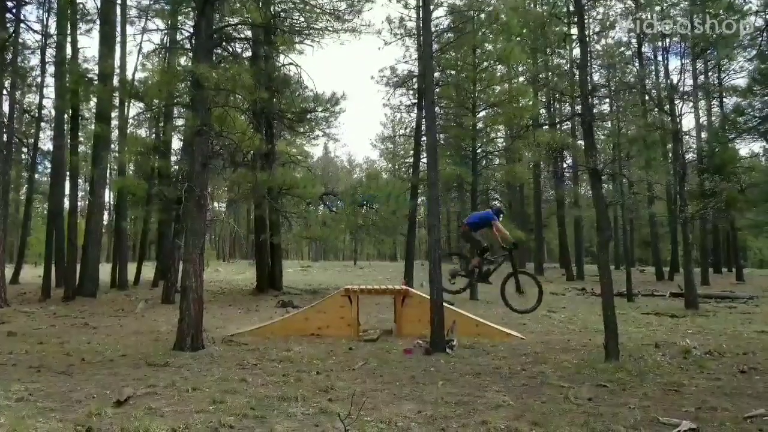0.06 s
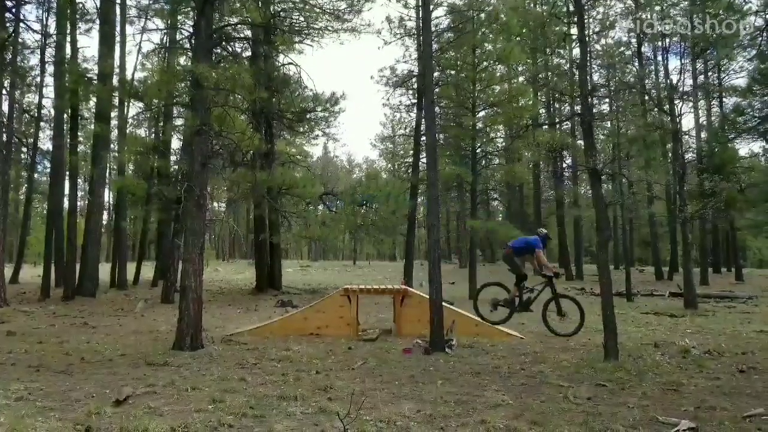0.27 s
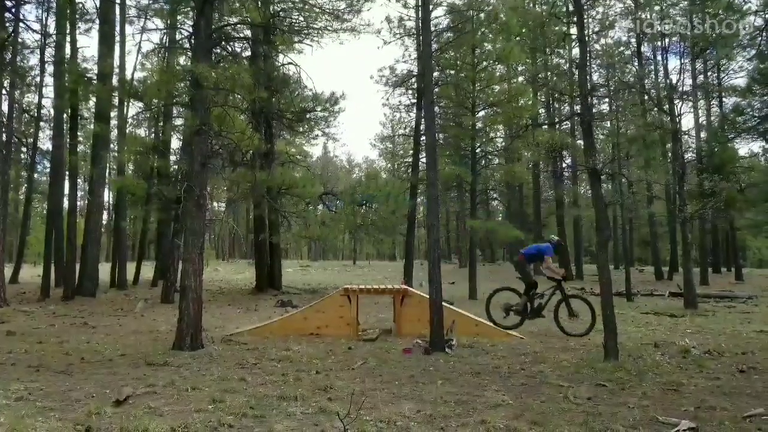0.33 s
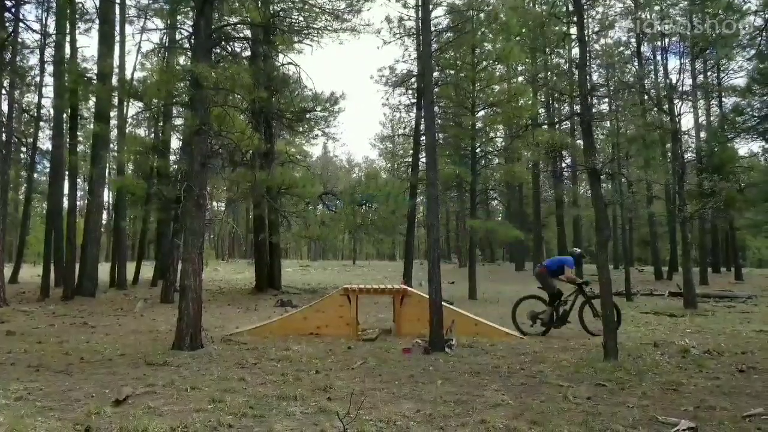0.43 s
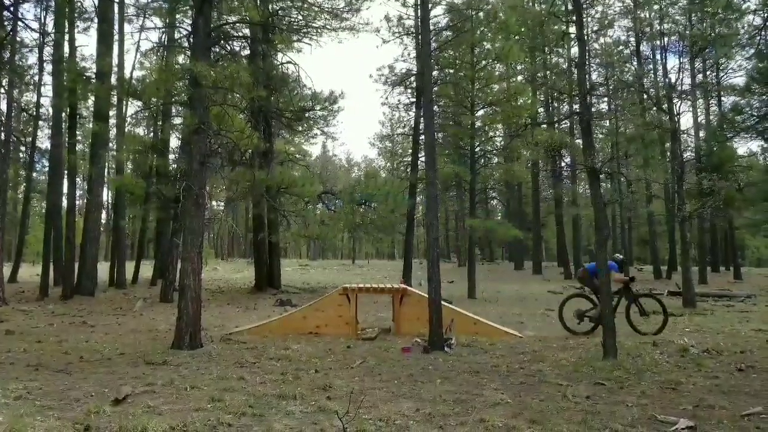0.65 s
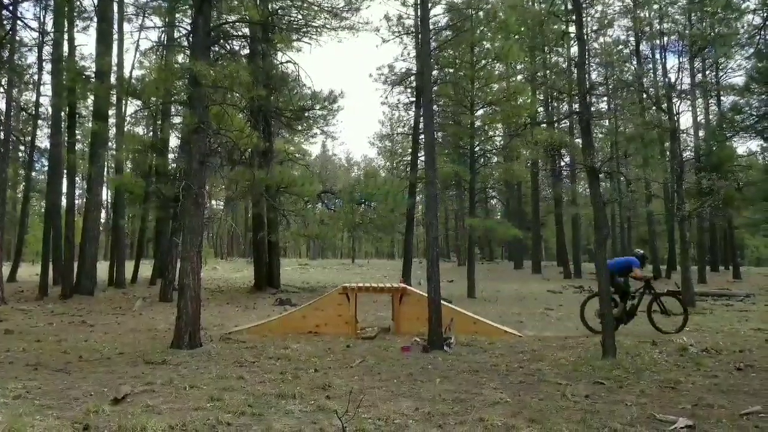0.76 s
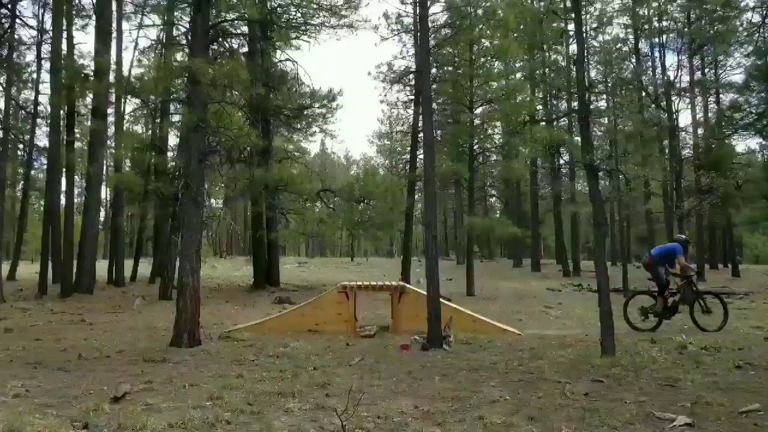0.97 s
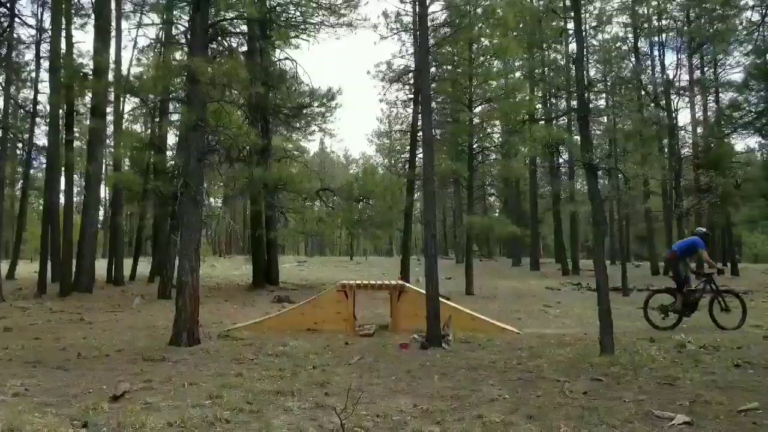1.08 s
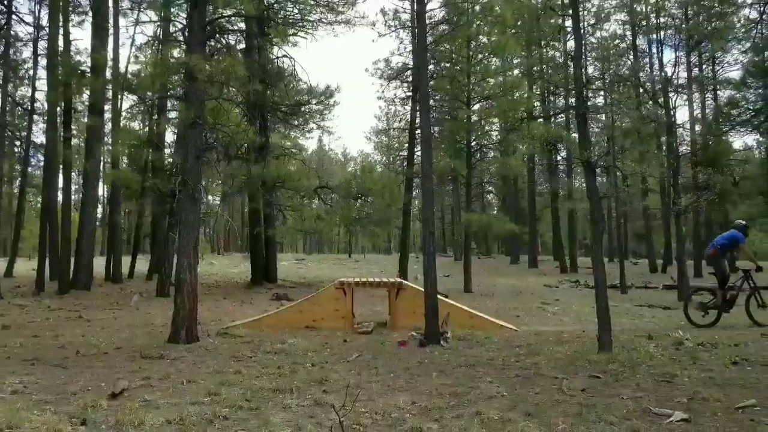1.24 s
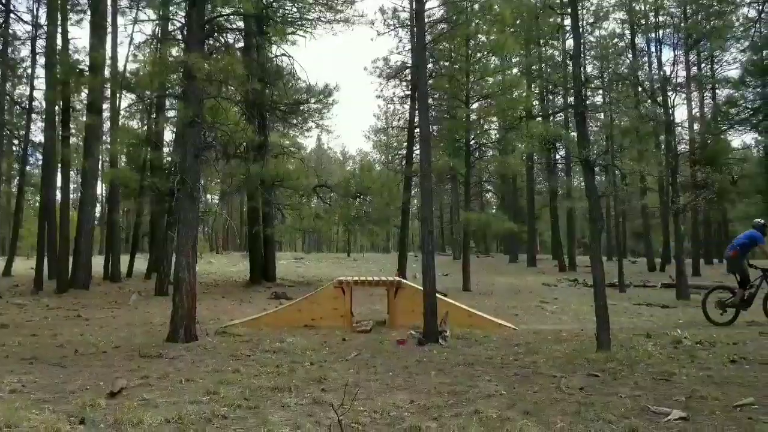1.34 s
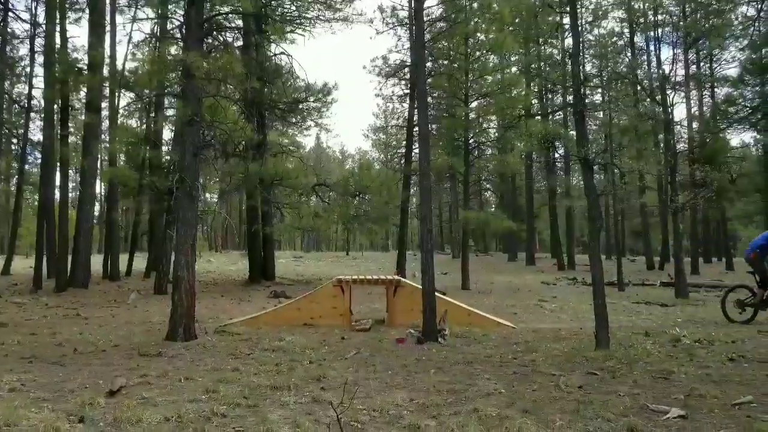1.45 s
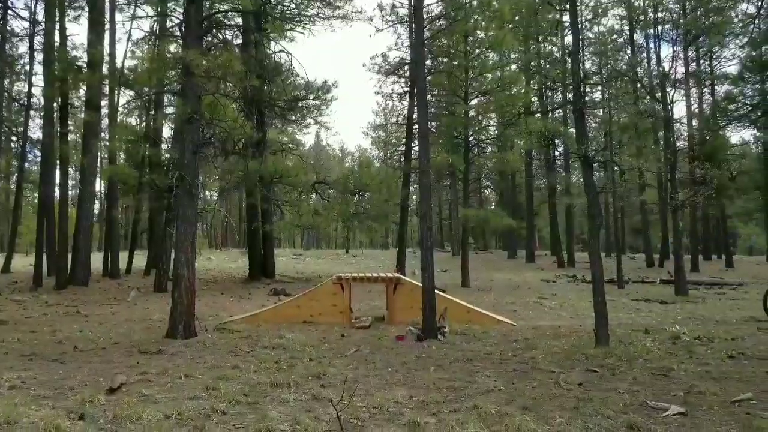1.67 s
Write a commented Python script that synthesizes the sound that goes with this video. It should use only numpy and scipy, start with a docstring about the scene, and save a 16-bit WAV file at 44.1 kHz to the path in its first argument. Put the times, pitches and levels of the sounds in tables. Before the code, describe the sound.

A mountain bike lands with a hollow wooden thud on a ramp, then its freewheel clicks away

```python
"""Mountain bike on a plywood ramp

Place: an open pine forest. A bike lands on a hollow ramp, rolls down it and coasts off to the right of two microphones.
Each blow rings the ramp's modes and cracks in noise; the trunks return it as a fading rumble of dense echoes.
Freewheel pawls ring the hub, falling silent through the heaviest blows; tyres, clatter and fizz are shaped noise.
Behind it all lies a steady, quiet forest air of coloured noise."""
import sys
import numpy as np
from scipy import signal
from scipy.fft import rfft, irfft, next_fast_len
from scipy.io import wavfile
from scipy.ndimage import uniform_filter1d, map_coordinates

SR = 44100
rng = np.random.default_rng(int(sys.argv[2]) if len(sys.argv) > 2 else 0)


def transcribe(u):
    """Save the signal u as a 16-bit wav file named by the first command-line argument.

    u: samples, shape (n,) or (channels, n), limited to [-1, 1]; the rate is SR.
    q: integer samples, one column per channel.
    """
    v = np.clip(np.atleast_2d(u).T, -1, 1)
    q = np.round(v * 32767).astype(np.int16)
    wavfile.write(sys.argv[1], SR, q)


N = 74970  # length [samples]


def gain_of(db):
    """Amplitude factor of a level in dB."""
    return 10 ** (np.asarray(db) / 20)


def evened(x):
    """Scales a signal to an RMS of one."""
    return x / np.sqrt(np.mean(x ** 2) + 1e-20)


def read(points, hz):
    """Reads a table of (frequency, value) along a logarithmic frequency axis."""
    f, value = np.transpose(points)
    return np.interp(np.log(hz + 1), np.log(f + 1), value)


def add(mix, s, sound):
    """Adds a sound to the mix at s seconds, cut off at the end."""
    part = mix[max(round(s * SR), 0):][:len(sound)]
    part += sound[:len(part)]


def colour(x, points, share=1):
    """Filters by a dB spectrum, or by a share of its dB."""
    size = next_fast_len(N + 4096)
    gain = gain_of(share * read(points, np.fft.rfftfreq(size, 1 / SR)))
    return irfft(rfft(x, size) * gain, size)[..., :N]


def noise(points, share=1):
    """Steady coloured noise with an RMS of one."""
    return evened(colour(rng.standard_normal(N), points, share))


def grain(depth_db, smooth_samples):
    """Random gain that wanders in dB, which makes steady noise gritty."""
    return gain_of(depth_db * evened(uniform_filter1d(rng.standard_normal(N), smooth_samples)))


# Blows and bumps of the tyres on the ramp:
# (time [s], boom level [dB], contact length [ms], crack level [dB], pitch of the panel struck most [Hz])
TYRE_BLOWS = [(.1722, -35, 6.3, -55.5, 101), (.2023, -26.5, 1.6, -44.5, 150), (0.2083, -12, 0.73, -19, 161),
              (.226, -8, 1.1, -29, 292), (0.2521, -15, 2.05, -40, 204), (.2742, -29.5, 1.4, -35.5, 246),
              (.301, -33.5, 0.4, -45, 306), (.33, -18, 3.7, -51, 223), (0.3809, -12, 2.16, -34, 138),
              (.3885, -20, 2.77, -42.5, 190), (.3945, -28, 1.07, -48.5, 744), (.4215, -22.5, 4.3, -60, 109),
              (0.47, -22, 2.27, -48, 140), (0.503, -28, 2.9, -56, 250), (.531, -31, 5, -51, 138),
              (0.625, -39.5, 4.5, -55, 247), (.673, -47, 3.2, -53, 92), (0.733, -39, 3, -58.5, 62),
              (.789, -40, 2.67, -55.5, 141), (0.875, -51.5, 3.7, -69.5, 195), (0.942, -53.5, 1.9, -62, 235)]
# Modes the hollow ramp rings with: (frequency [Hz], relative level [dB], T60 [s])
RAMP_MODES = [(46, -45, 0.073), (67.7, -7.5, 0.28), (97.9, 0.5, 0.11), (140.1, -8, 0.24), (204.4, -7, 0.23),
              (354.7, -17, 0.23), (531, -7.5, 0.11), (616.6, -7, 0.093), (700.4, -8, 0.23),
              (757.8, -3.5, 0.13), (874.4, 2, 0.04), (1180, -14, .09), (1290, -19, 0.043),
              (1480, -8.5, 0.081)]
# Pitch of the deck panel as the rider's weight rolls over it: (time [s], frequency [Hz])
DECK_PITCH = [(.2, 259.7), (.248, 272.5), (.266, 222.5), (.29, 249.4), (.312, 303), (.335, 239),
              (.362, 268), (.39, 270.8), (.455, 300), (.495, 242), (.53, 282), (.65, 247), (.72, 230),
              (.78, 286)]
# Spectrum of the cracking boards: (frequency [Hz], relative density [dB per Hz])
CRACK_SPECTRUM = [(300, 2.5), (550, -1.5), (850, -1.5), (1000, -10), (1180, -5.5), (1900, -10.5),
                  (2400, -10.5), (2900, -9), (3400, -12.5), (4500, -9.5), (5300, -17.5), (6050, -14),
                  (7200, -34.5), (8500, -69), (11500, -39.5), (15500, -57.5)]
DECK_DB, DECK_T60 = 1., 0.16  # relative level [dB], decay [s]
PLACE_DB_PER_OCTAVE, SWELL_S = 5, 0.00098  # loss away from the struck panel; time constant of the swell
IN_STEP_BELOW_HZ = 120  # modes below this start with the same sign
SNAP_DB, SNAP_T60 = 4, 0.0058  # the very first edge of each crack [dB re crack, s]
CRACK_T60 = 0.09  # [s]
SHUDDER_DB, SHUDDER_T60 = -8.5, 0.24  # then the boards shudder [dB re crack, s]


def ramp():
    """Each blow is a rounded push that swells the panel modes near it, plus a crack and a shudder of noise."""
    boom, crack, t = np.zeros(N), np.zeros(N), np.arange(SR // 2) / SR
    modes = RAMP_MODES + [(DECK_PITCH[0][1], DECK_DB, DECK_T60)]
    hz, db, t60 = np.transpose(modes)[:, :, None]
    alternating = (-1.) ** np.arange(len(hz))[:, None]
    sign = np.where(hz < IN_STEP_BELOW_HZ, 1, alternating)
    for s, boom_db, contact_ms, crack_db, struck_hz in TYRE_BLOWS:
        push = np.hanning(max(round(contact_ms * SR / 1000), 4))
        turns = hz * t
        # the last mode is the deck, whose pitch moves
        turns[-1] = np.cumsum(np.interp(s + t, *np.transpose(DECK_PITCH))) / SR
        near_db = np.maximum(-PLACE_DB_PER_OCTAVE * abs(np.log2(hz / struck_hz)), -14)
        strength = sign * gain_of(db + near_db - 60 * t / t60)
        ring = (strength * np.sin(2 * np.pi * turns)).sum(0)
        swelled = ring * (1 - np.exp(-t / SWELL_S))
        add(boom, s, gain_of(boom_db) * np.convolve(swelled, push / push.sum()))
        add(crack, s, gain_of(crack_db + SNAP_DB - 60 * t / SNAP_T60))
        add(crack, s, gain_of(crack_db - 60 * t / CRACK_T60))
        add(crack, s, gain_of(crack_db + SHUDDER_DB - 60 * t / SHUDDER_T60))
    rattle = evened(grain(2.5, 60))
    # about half the colour goes on before the bursts are shaped, half after
    bursts = crack * rattle * noise(CRACK_SPECTRUM, .5)
    crack_rms = np.sqrt(np.mean(crack ** 2))
    return boom + crack_rms * evened(colour(bursts, CRACK_SPECTRUM, 0.54))


# Freewheel pawls: (time [s], level [dB], hub resonance that rings most [Hz])
PAWL_TICKS = [(0.0202, -38.5, 2400), (0.0441, -48.5, 4070), (0.064, -49.5, 3530), (0.0784, -69.5, 3660),
              (0.1012, -46, 6180), (0.1223, -57, 3790), (0.1321, -46, 3900), (0.1516, -49, 6200),
              (0.1593, -43, 3170), (0.416, -41.5, 3720), (0.444, -41.5, 4230), (0.4519, -41.5, 6030),
              (0.4638, -44, 5600), (0.4697, -47, 6010), (0.4778, -44, 6140), (0.4838, -37.5, 6100),
              (0.493, -38.5, 6200), (0.5029, -60, 5100), (0.5284, -43, 3150), (0.5642, -47, 3520),
              (0.5899, -42, 5700), (0.6054, -45.5, 3700), (0.6223, -44.5, 3440), (0.6457, -45, 5460),
              (0.6693, -46, 6230), (0.6823, -47.5, 5600), (0.6939, -45, 5900), (0.7068, -43.5, 3670),
              (0.7285, -41, 4050), (0.7834, -44, 5970), (0.803, -52, 5685), (0.8173, -44, 5150),
              (0.836, -45, 5497), (0.8505, -42, 5390), (0.8682, -42.5, 5600), (0.8883, -57, 3670),
              (0.9019, -42, 3560), (0.92, -62, 5700), (0.93, -42, 5800), (0.9463, -42.5, 3970),
              (0.9549, -63, 3930), (0.9756, -45, 3590), (1.0, -43, 3750), (1.0116, -47.5, 3680),
              (1.0292, -47, 5770), (1.0448, -65, 3830), (1.0625, -45, 6070), (1.078, -47, 3730),
              (1.0898, -59, 3700), (1.1092, -46, 3900), (1.1399, -45.5, 3710), (1.1544, -45, 3580),
              (1.169, -73.5, 3940), (1.187, -43, 3920), (1.1993, -46.5, 4260), (1.2217, -52, 3730),
              (1.233, -45, 2880), (1.2417, -44.5, 2960), (1.2543, -50, 4130), (1.2883, -62, 3730),
              (1.3075, -50.5, 3640), (1.3402, -42.5, 2750), (1.3498, -62, 2880), (1.3669, -41.5, 2610),
              (1.3927, -48, 2760), (1.407, -50, 2800), (1.4228, -45.5, 4500), (1.454, -42, 2670),
              (1.505, -45.4, 2820), (1.533, -46, 5500), (1.5446, -44.7, 2820), (1.5684, -48, 4650),
              (1.5998, -48.5, 3500), (1.612, -48, 2950), (1.6207, -48.5, 3640), (1.6383, -52, 2840),
              (1.6485, -50.5, 3000), (1.663, -73, 5450), (1.673, -51, 2800), (1.6939, -48, 2860)]
# Hiss of each tick: (frequency [Hz], relative density [dB per Hz])
TICK_SPECTRUM = [(1200, -23.5), (2400, 2.5), (3500, 4), (4700, -17), (6000, 0.5), (7200, -12.5),
                 (8400, -26.5), (10500, -8), (12800, -1.5), (15500, -8.5)]
# Resonances of the hub: (frequency [Hz], relative level [dB], T60 [s])
HUB_MODES = [(2825, 2, 0.027), (3740, -3.5, 0.071), (4060, -4, 0.041), (5370, -4.5, 0.032),
             (6145, -5, 0.035)]
HUB_DB_PER_OCTAVE = 36.  # loss away from the resonance that rings most
HUB_SPREAD_DB, HUB_DETUNE = 1.5, .006  # random spread of level [dB] and pitch [fraction]
TICK_RISE_S, TICK_T60, PUFF_DB = 0.00073, 0.02, 0.5  # rise [s]; decay [s] and relative level [dB] of the hiss


def freewheel():
    """Each pawl gives a puff of hiss and rings the hub, most near its own resonance."""
    out, t = np.zeros(N), np.arange(3000) / SR
    hz, db, t60 = np.transpose(HUB_MODES)[:, :, None]
    hiss = noise(TICK_SPECTRUM)
    luck = rng.standard_normal((len(PAWL_TICKS), 3, len(HUB_MODES), 1))
    for (s, level_db, ring_hz), (strength, detune, phase) in zip(PAWL_TICKS, luck):
        near_db = np.maximum(-HUB_DB_PER_OCTAVE * abs(np.log2(hz / ring_hz)), -13)
        decay = gain_of(db + near_db + HUB_SPREAD_DB * strength - 60 * t / t60)
        ring = decay * np.sin(2 * np.pi * hz * (1 + HUB_DETUNE * detune) * t + 3 * phase)
        puff = np.resize(hiss[round(s * SR):], len(t)) * gain_of(PUFF_DB - 60 * t / TICK_T60)
        rise = np.minimum(t / TICK_RISE_S, 1)
        add(out, s, gain_of(level_db) * rise * (puff + ring.sum(0)))
    return out


# Tyres rolling: (time [s], level [dB])
ROLL_LEVEL = [(0.17, -42.5), (0.232, -51.5), (0.352, -45.5), (0.394, -61), (0.532, -54.5), (0.676, -63.5),
              (1.278, -57), (1.7, -56.5)]
# Spectrum of the tyres: (frequency [Hz], relative density [dB per Hz])
ROLL_SPECTRUM = [(24, -52.5), (40, -19), (106, -0.5), (512, -21), (780, -8), (1040, -14.5), (1690, -5),
                 (2360, -6), (2760, -8), (4800, -12), (6700, -13.5), (8000, -33), (10400, -47),
                 (17600, -120)]


def rolling():
    """Knobbly tyres hiss and crunch as grainy noise once they touch down."""
    t, (s, db) = np.arange(N) / SR, np.transpose(ROLL_LEVEL)
    touchdown = np.clip((t - TYRE_BLOWS[0][0]) / 0.0026, 0, 1)
    crunch = evened(grain(2., 200) * noise(ROLL_SPECTRUM))
    return touchdown * gain_of(np.interp(t, s, db)) * crunch


# Clatter of chain and cables after the jolts: (time [s], level [dB], length [s])
CHAIN_CLATTER = [(0.405, -66, 0.007), (0.437, -56, 0.11), (0.49, -49.5, 0.065), (0.713, -53.5, 0.052),
                 (0.904, -58, 0.019), (1.247, -68, 0.028), (1.44, -60, .025)]
# Spectrum of the clatter: (frequency [Hz], relative density [dB per Hz])
CLATTER_SPECTRUM = [(590, -53), (1000, -6), (1580, -13), (2530, -14), (4290, -1.5), (6710, -5.5),
                    (8250, -22), (12300, -21), (15500, -40)]


def clatter():
    """Chain and cables rattle in short swells of dense metallic grit."""
    shape = np.zeros(N)
    for s, db, length in CHAIN_CLATTER:
        add(shape, s, gain_of(db) * signal.windows.tukey(round(length * SR), .6))
    return shape * evened(grain(3., 40) * noise(CLATTER_SPECTRUM))


# Thin fizz in the top treble, probably the shaken drivetrain: (time [s], level before the grain [dB])
FIZZ_LEVEL = [(0, -66.5), (0.141, -63), (.2, -57.5), (.3, -56.5), (0.346, -57.5), (0.432, -66), (.455, -66),
              (.53, -59), (.56, -74), (.63, -78), (.75, -76), (1.0, -72), (1.12, -69), (1.25, -65),
              (1.399, -67.5), (1.469, -63.5), (1.62, -57.5), (1.7, -68.5)]
# Spectrum of the fizz: (frequency [Hz], relative density [dB per Hz])
FIZZ_SPECTRUM = [(4120, -34.5), (7000, -25.5), (7850, -10.5), (8340, -16), (9550, -20), (10300, -12.5),
                 (12100, 5), (14100, -10), (15700, -2)]
FIZZ_DIFFUSE_DB = 0.  # diffuse part, relative to the part from the bike


def fizz():
    """Grainy top-treble hiss, in part from the bike and in part diffuse, unrelated left and right."""
    s, db = np.transpose(FIZZ_LEVEL)
    level = gain_of(np.interp(np.arange(N) / SR, s, db)) * grain(2.2, 300)
    diffuse = np.array([noise(FIZZ_SPECTRUM), noise(FIZZ_SPECTRUM)])
    return level * noise(FIZZ_SPECTRUM), level * gain_of(FIZZ_DIFFUSE_DB) * diffuse


# The bike moves right: (time [s], lag of the left microphone [ms])
LEFT_MIC_LAG = [(0, 0.12), (0.299, 0.094), (.5, 0.16), (1.7, 0.3)]


def heard_directly(x):
    """The left microphone hears the bike a little later than the right, and the lag changes as it moves."""
    n, (s, ms) = np.arange(N), np.transpose(LEFT_MIC_LAG)
    lag = np.interp(n / SR, s, ms) * SR / 1000
    return np.array([map_coordinates(x, [n - lag], order=5), x])


# Likeness of diffuse sound at the two microphones: (frequency [Hz], likeness [0-1])
DIFFUSE_LIKENESS = [(60, 1), (300, 0.92), (700, 0.7), (1500, 0), (4000, 0.1), (12000, 0.2)]


def pair(a, b):
    """Diffuse sound at two microphones: nearly alike in the bass, largely unrelated in the treble."""
    size = a.shape[-1]
    same = np.clip(read(DIFFUSE_LIKENESS, np.fft.rfftfreq(size, 1 / SR)), 0, 1)
    return np.array([a, irfft(same * rfft(a) + np.sqrt(1 - same ** 2) * rfft(b), size)])


# Fading of the echoes among the trees: (frequency [Hz], T60 [s])
TREE_DECAY = [(60, 0.95), (170, 1.54), (300, 0.75), (700, 0.96), (2000, 0.83), (6000, 0.31), (12000, 1.2)]
FIRST_ECHO_S = .012


def trees(x):
    """Scattered echoes off the trunks, each band dying at its own speed."""
    taps = np.zeros((2, 2 * SR))
    # one echo of random sign somewhere in every 20 samples
    at = np.arange(round(FIRST_ECHO_S * SR), 2 * SR - 20, 20)
    jitter = rng.integers(0, 20, (2, len(at)))
    np.put_along_axis(taps, at + jitter, rng.choice([-1., 1.], (2, len(at))), 1)
    hz, t, z = signal.stft(pair(*taps), SR, nperseg=512)
    fade = gain_of(-60 * t / read(TREE_DECAY, hz)[:, None])
    fade /= np.sqrt((fade ** 2).sum(1, keepdims=True))  # equal energy in every band
    tail = signal.istft(z * fade, SR, nperseg=512)[1]
    return signal.fftconvolve(x[None], tail / np.linalg.norm(tail[0]), axes=1)[:, :N]


# Spectrum of the forest air: (frequency [Hz], relative density [dB per Hz])
AIR_SPECTRUM = [(15, -33.5), (25, -3.5), (145, -4), (287, -18.5), (384, -18), (467, -27), (1100, -38.5),
                (1740, -15.5), (3620, -13.5), (4730, -21), (6340, -30), (8500, -42.5), (11000, -76.5),
                (18700, -120)]
AIR_DB = -60


def forest_air():
    """Steady diffuse noise all around the microphones."""
    return gain_of(AIR_DB) * pair(noise(AIR_SPECTRUM), noise(AIR_SPECTRUM))


HITS_TREES_DB, BIKE_TREES_DB = -9, -3  # echo levels of the ramp and of the bike


def scene():
    """Direct sound of ramp and bike, their echoes off the trunks, and the diffuse background."""
    hits, (near_fizz, diffuse_fizz) = ramp(), fizz()
    bike = freewheel() + rolling() + clatter()
    direct = heard_directly(hits + bike + near_fizz)
    echoes = trees(gain_of(HITS_TREES_DB) * hits + gain_of(BIKE_TREES_DB) * bike)
    return direct + echoes + forest_air() + diffuse_fizz


# Colouring of the two microphones: (frequency [Hz], left minus right [dB])
MIC_BALANCE = [(60, .5), (380, 0.5), (1100, 5), (2400, 6), (5000, -7), (9000, -4), (15000, 1.5)]
EDGE_HZ = 15850  # top of the band


def record(dry):
    """The two microphones are coloured oppositely by half the balance each; then the band limit."""
    mics = np.array([colour(dry[0], MIC_BALANCE, .5), colour(dry[1], MIC_BALANCE, -.5)])
    low_pass = signal.firwin(1023, EDGE_HZ, window=("kaiser", 9), fs=SR)
    return signal.oaconvolve(mics, low_pass[None], "same")


dry = scene()
out = record(dry)
transcribe(out)
```